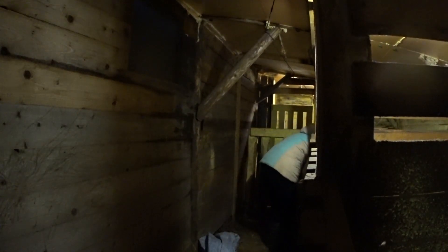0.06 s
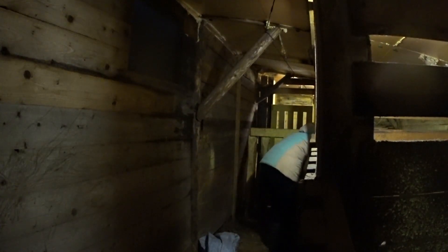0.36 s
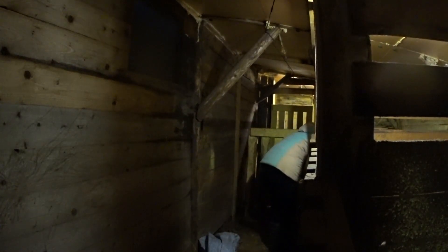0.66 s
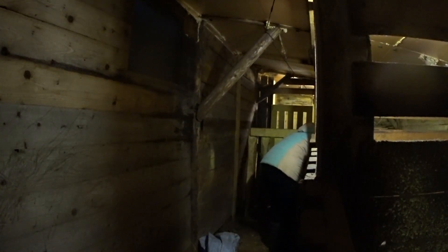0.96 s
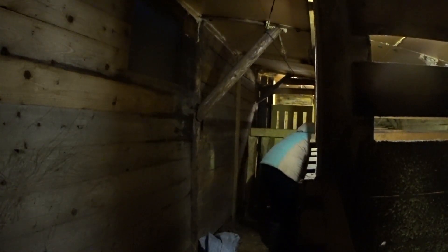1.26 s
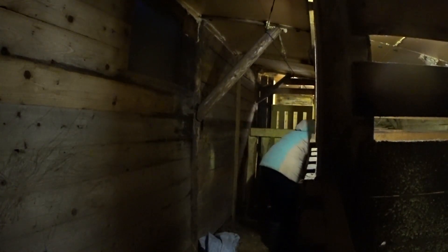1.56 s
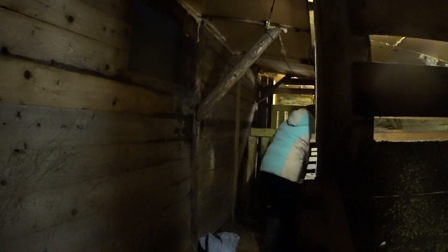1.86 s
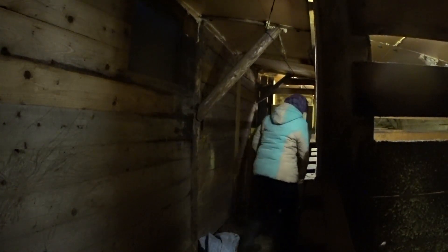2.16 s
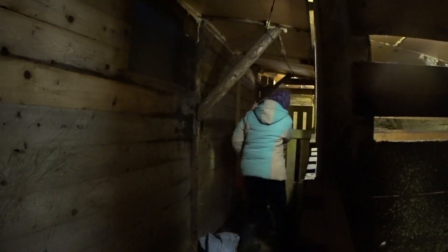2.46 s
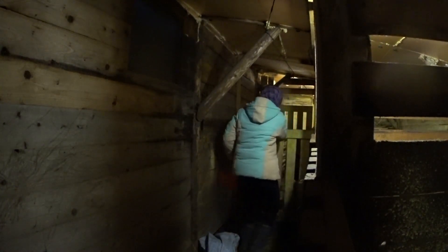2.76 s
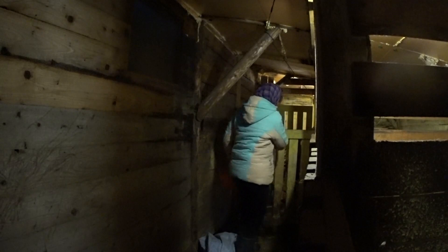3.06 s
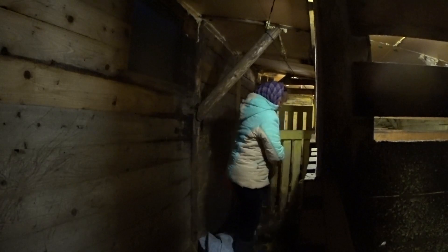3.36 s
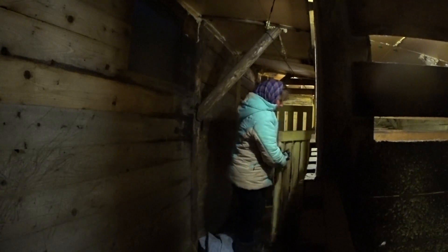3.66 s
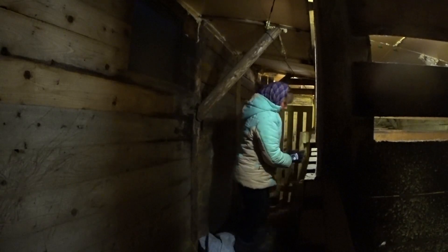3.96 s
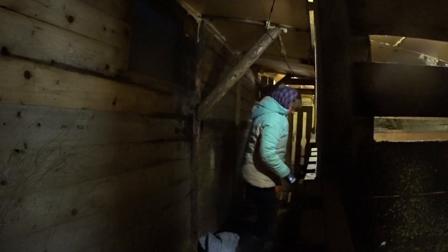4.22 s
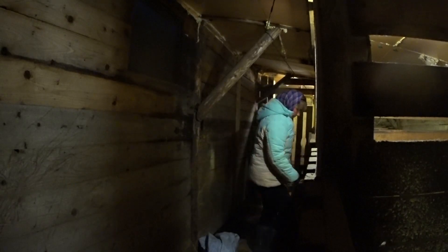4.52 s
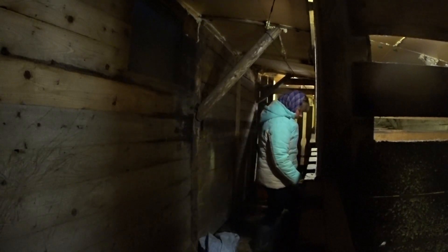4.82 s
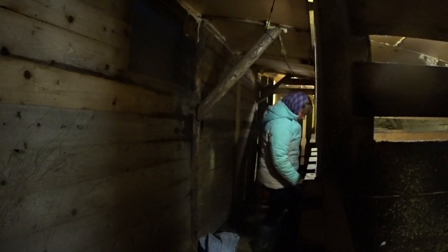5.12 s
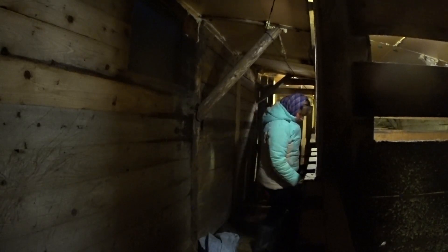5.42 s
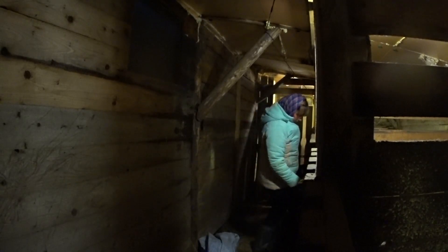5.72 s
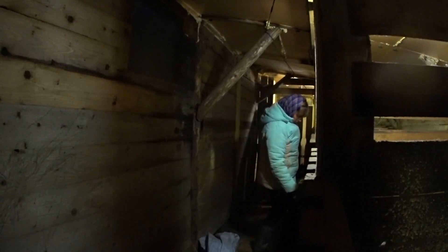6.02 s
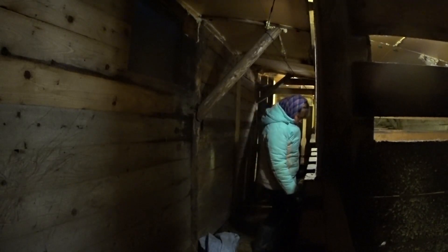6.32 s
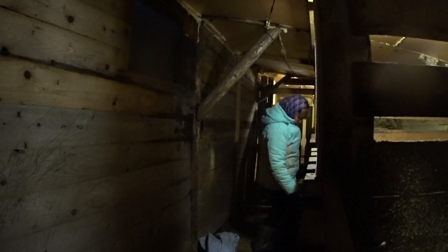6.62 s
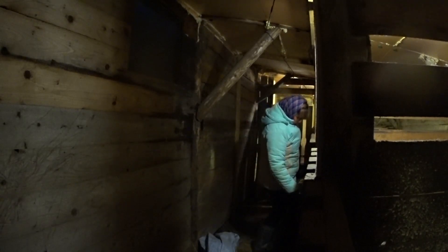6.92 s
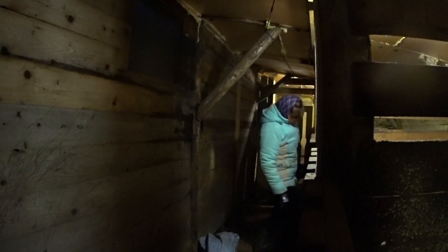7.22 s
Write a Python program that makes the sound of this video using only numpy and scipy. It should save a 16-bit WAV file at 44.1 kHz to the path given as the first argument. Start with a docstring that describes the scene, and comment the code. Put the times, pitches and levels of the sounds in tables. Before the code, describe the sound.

Feed pellets pour into a ringing trough, a jacket swishes, a wooden gate thumps shut, and a scoop clatters against boards.

```python
"""In a wooden barn, feed pellets pour from a scoop, pattering and hissing into a ringing trough.
A person steps back, their padded jacket swishing and their boots scuffing the littered floor.
They move a slatted pen gate, which thumps shut, and a thin metal scrape follows.
Last, the scoop clatters against the pen boards. Close plank walls thicken every blow with echoes,
and it is all heard through two microphones set close together."""
import sys
import numpy as np
from scipy import signal
from scipy.fft import rfft, irfft, next_fast_len
from scipy.io import wavfile
from scipy.ndimage import map_coordinates

SR = 44100
rng = np.random.default_rng(int(sys.argv[2]) if len(sys.argv) > 2 else 0)


def inscribe(sig):
    """Save sig as 16-bit PCM at rate SR to the path in sys.argv[1].

    A 1-D sig is mono; a 2-D sig holds one channel per row.
    Samples are clipped to [-1, 1] before scaling.
    """
    pcm = np.round(np.clip(np.atleast_2d(sig).T, -1, 1) * 32767)
    wavfile.write(sys.argv[1], SR, pcm.astype(np.int16))


N = 325458

# Levels are relative. A "tone" table says how strong low and high sounds are.
# A "ring time" is how long a sound takes to fade by 60 dB.
# the barn's still air: (frequency [Hz], level [dB])
AIR_TONE = [(60, -15.0), (800, 0), (3000, -13.0), (11000, -12.5)]
# how long the barn echoes: (frequency [Hz], ring time [s])
BARN_RING_TIMES = [(60, 0.52), (260, 0.26), (700, 0.23), (1840, 0.2), (4850, 0.18), (11000, 0.084)]
# echoes from the nearest planks: (delay [s], level [dB])
WALL_ECHOES = [(.0029, -36), (.0068, -24.5), (0.0113, -15.5), (0.0169, -18)]

# sleeve rubbing on jacket: (peak time [s], level [dB], rise [s], fall [s], level change for zing [dB])
SLEEVE_STROKES = [(1.544, -55.5, 0.083, 0.062, -9), (1.70, -57, 0.1, 0.028, -7),
                  (1.845, -48.5, 0.11, 0.044, -7.5), (1.994, -50.5, 0.092, 0.049, -6),
                  (2.166, -45.5, 0.068, 0.037, -4), (2.336, -44, .11, 0.042, -7),
                  (2.526, -53, 0.13, .06, -4.5), (2.681, -40, .08, 0.02, 2.5),
                  (2.744, -42.5, 0.1, 0.06, -9), (2.845, -48.5, .09, 0.017, -4.5),
                  (2.97, -57.5, .09, 0.11, -5), (3.211, -55.5, 0.039, .08, 2),
                  (3.339, -46.5, 0.17, 0.076, -3), (3.56, -59.5, 0.16, 0.066, -12),
                  (3.714, -63, 0.069, 0.028, -1.5), (3.848, -57.5, 0.078, 0.06, -7.5),
                  (4.07, -62.5, 0.17, 0.057, -5), (4.186, -44, 0.13, 0.042, -6.5),
                  (4.30, -51.5, .04, 0.097, -8), (4.53, -57, 0.14, .03, -5),
                  (4.587, -36.5, 0.073, 0.025, -3.5), (4.795, -47, 0.025, 0.095, 0.5),
                  (4.856, -32.5, .013, 0.042, -24), (4.971, -39.5, 0.041, 0.021, 1.5),
                  (5.104, -51.5, 0.18, 0.18, -4.5), (5.254, -61, .08, 0.022, 6),
                  (5.375, -60.5, .1, 0.038, -1), (5.615, -70, .05, 0.022, -9),
                  (5.866, -51.5, .032, 0.17, -11), (6.075, -56, 0.075, 0.056, -7),
                  (6.222, -47.5, 0.014, 0.23, -3.5), (6.558, -42.5, 0.083, 0.019, -3),
                  (6.70, -44.5, 0.073, 0.032, 0), (7.0, -42, 0.39, 0.14, -8.5),
                  (7.13, -43.5, 0.11, 0.048, -4), (7.24, -41.5, 0.043, 0.095, -3.5)]
# the nylon's swish: (frequency [Hz], level [dB])
SWISH_TONE = [(150, -30.5), (400, -10.5), (800, 4), (1500, 3.5), (2800, 1), (4500, -1), (6500, -4.5),
              (8500, -15.5), (11000, -21.5)]
# the nylon's high zing: (frequency [Hz], level [dB])
ZING_TONE = [(4000, -41.5), (6500, -1), (8000, 1.5), (11000, -8)]
# boots and gate dragging over litter:
# (peak time [s], level [dB], rise [s], fall [s], centre frequency [Hz], hollow boost [dB])
DRAGS = [(1.389, -46.5, 0.037, 0.04, 463, 9), (1.614, -49, 0.023, 0.02, 430, -2),
         (1.815, -40.5, 0.027, 0.061, 890, -2.5), (1.99, -50.5, 0.049, 0.092, 880, 5),
         (2.275, -35.5, 0.0117, 0.07, 436, -19), (2.429, -52, 0.21, 0.27, 726, -20.5),
         (2.533, -33.5, 0.018, 0.029, 830, -7), (2.799, -41, 0.074, 0.038, 463, 10),
         (3.0, -55, 0.064, 0.12, 1130, -1), (3.31, -50, 0.04, 0.067, 885, 0),
         (3.5, -46, 0.071, 0.064, 804, 4.5), (3.854, -44, 0.021, 0.03, 1060, -2),
         (4.162, -38, 0.037, 0.078, 1190, 4), (4.332, -35.5, 0.024, 0.036, 935, 7),
         (4.5, -53.5, 0.07, 0.046, 810, 3), (4.59, -44, 0.011, 0.052, 1420, -1),
         (4.804, -36.5, 0.0099, 0.018, 705, 0), (5.17, -58, 0.054, 0.045, 900, -4),
         (5.369, -36.5, 0.028, 0.026, 1080, 8.5), (5.48, -65, 0.049, 0.057, 864, 5.5),
         (5.625, -61, 0.027, 0.025, 1003, -1.5), (5.89, -45, 0.019, 0.082, 955, 8.5),
         (6.07, -39.5, 0.012, 0.036, 870, 1), (6.11, -39, 0.023, 0.032, 696, 1.5),
         (6.67, -41, 0.043, 0.13, 646, -5), (7.161, -36, 0.06, 0.032, 590, 10.5),
         (7.243, -31, 0.015, 0.048, 786, 3), (7.36, -36, 0.042, 0.042, 905, -15)]
# crushed litter: (frequency [times the centre frequency], level [dB])
LITTER_TONE = [(.05, -34), (.15, -25), (.4, -5.5), (.72, 0), (1, 3.5), (1.55, 1.5), (2.5, -6), (5, -20.5),
               (12, -42.5)]
# a thin scrape, perhaps the gate's fastening: (time [s], level [dB])
SCRAPE_LEVELS = [(4.98, -55), (5.04, -53), (5.09, -45), (5.17, -48.5), (5.25, -53), (5.3, -74)]
# the notes of the scraped metal: (frequency [Hz], width [Hz], level [dB])
SCRAPE_NOTES = [(4420, 400, -4), (4950, 300, -7), (5430, 230, -1.5)]
# bright pings, and a low hum around the scoop's knocks:
# (time [s], frequency [Hz], level [dB], rise [s], ring time [s], width [Hz])
RINGING_NOTES = [(0.796, 2690, -27, .008, 0.096, 190), (1.80, 762, -40.5, 0.012, 0.22, 83),
                 (4.829, 1224, -17.5, 0.0027, 0.077, 56), (5.881, 976, -37.5, 0.0015, 0.09, 23),
                 (5.882, 1840, -42, .002, 0.11, 114), (6.064, 362, -50, 0.06, 0.25, 12),
                 (6.258, 369, -37.5, 0.0043, 0.62, 31), (6.266, 9100, -43.5, 0.0089, 0.18, 95),
                 (6.331, 3000, -20.5, .003, 0.056, 81), (6.74, 2603, -21.5, 0.0027, 0.14, 43),
                 (6.832, 1941, -16.5, 0.0085, 0.28, 16.8), (6.832, 1995, -25.5, .006, 0.5, 105),
                 (6.839, 359.6, -34, 0.032, 0.43, 40), (7.268, 1256, -18, 0.0011, 0.15, 35),
                 (7.269, 3080, -20.5, 0.0027, 0.067, 190)]

# heavy blows on wood:
# (time [s], level [dB], bass tilt [dB per octave], rise [s], board note [Hz], width [Hz], echo [dB])
HEAVY_BLOWS = [(2.254, -47, 7, 0.002, 397, 298, -18), (2.3, -27, 10, 0.0027, 440, 260, -21.5),
               (2.315, -26, 10.5, 0.0043, 326, 200, -15.5), (2.338, -32, 3, 0.0099, 480, 300, -14),
               (2.738, -24, -4.5, 0.014, 1100, 500, -17.5), (2.836, -34.5, -4, 0.0072, 540, 400, -16.5),
               (4.188, -31.5, -0.5, 0.00075, 740, 400, -7), (4.828, -10, -.5, 0.0038, 660, 250, -12),
               (4.854, -11, 2, 0.0035, 488, 250, -12), (4.885, -26.5, 9, .004, 150, 99, -13.5),
               (4.904, -28.5, -9, 0.0043, 1430, 500, -10.5), (5.357, -39, -4, .006, 1280, 600, -12),
               (5.881, -42, -12, 0.00093, 1340, 620, -16), (6.701, -22.5, -2.5, 0.0014, 650, 306, -7),
               (6.984, -19, -1.5, 0.0038, 810, 200, -7)]
# a dull blow on wood: (frequency [Hz], level [dB])
THUMP_TONE = [(30, -50.5), (55, -51), (85, -26.5), (150, -23), (245, -11), (450, -5.5), (750, -1.5),
              (950, -1.5), (1300, -5), (1850, -7.5), (2400, -21.5), (3300, -36.5), (6400, -42.5),
              (11000, -60.5)]
# the scoop hitting the boards:
# (time [s], level [dB], treble tilt [dB per octave], low note [Hz], high note [Hz], echo [dB])
SCOOP_HITS = [(6.255, -11.5, 2, 1590, 1930, 1), (6.281, -19, -1, 1310, 1700, 18),
              (6.328, -9.5, 0.5, 1644, 3140, 0.5), (6.453, -20, 0.5, 1530, 4660, 12),
              (6.467, -9.5, 0.4, 550, 1480, -5), (6.514, -16, -4, 1023, 1470, -6),
              (6.740, -11, 0, 1704, 2520, -8), (6.777, -17, -0.5, 1600, 2550, -6),
              (6.826, -12, 0.6, 1540, 1940, -3.5), (6.850, -23, 0.5, 1370, 2000, 15),
              (6.880, -21.5, -1.5, 945, 2700, 17), (6.915, -18.5, -2.5, 1260, 1950, 16),
              (7.0482, -15, -1.5, 1190, 1600, -5), (7.061, -16, -2.5, 1320, 1750, 0),
              (7.267, -12.5, -1.6, 1195, 2510, -3)]
# a hard knock on the boards: (frequency [Hz], level [dB])
CLACK_TONE = [(30, -66), (55, -44), (80, -38), (200, -30), (350, -21.5), (560, -5.5), (960, -2.5),
              (1480, 0), (1980, -2), (2320, -8), (3100, -10.5), (3800, -18), (4770, -17.5), (11000, -35)]
# the notes the scoop rings with: (frequency [Hz], level [dB], ring time [s])
SCOOP_NOTES = [(378, -17.5, 0.29), (648, -7, 0.094), (1036, -14, 0.11), (1427, 11, 0.061),
               (1520, -11.5, 0.15), (1588, -20, 0.076), (1719, 5, 0.16), (2710, -16, 0.29),
               (2720, -6, 0.13), (2820, -0.5, 0.086), (4560, -6, 0.11), (5870, -13, 0.13),
               (7400, -22, 0.26)]

# the stream of feed as the scoop tips and empties: (time [s], level [dB])
FEED_FLOW = [(0.0, -25), (0.024, -23.5), (0.07, -27.5), (0.17, -22), (0.216, -25.5), (0.45, -19),
             (0.554, -25.5), (0.572, -25), (0.626, -27), (0.68, -24.5), (0.746, -29), (0.814, -24.5),
             (0.834, -30.5), (0.926, -25.5), (1.22, -24.5), (1.386, -40), (1.448, -56.5), (1.5, -59)]
# lumps of feed sliding out at once: (peak time [s], thud level [dB], spray level [dB])
FEED_LUMPS = [(.015, -34, -50), (.12, -35.5, -45), (.195, -28.5, -27), (.46, -29, -29), (.505, -35.5, -32),
              (.575, -43, -25.5), (.675, -52.5, -32.5), (.815, -33.5, -30.5), (.98, -37, -49),
              (1.095, -55, -30.5), (1.205, -35.5, -37), (1.37, -47, -49)]
# the trough's floor drumming: (frequency [Hz], level [dB])
DRUM_TONE = [(35, -53.5), (70, -44), (115, -41.5), (165, -17.5), (220, -11.5), (340, -3.5), (440, 5.5),
             (560, 5), (800, -16), (2000, -40.5)]
# pellets landing: (frequency [Hz], level [dB])
PATTER_TONE = [(100, -53), (300, -21.5), (600, -10), (950, -1), (1420, -2.5), (2140, -1), (3400, -9.5),
               (6200, -16.5), (11000, -30)]
# pellets sliding over each other: (frequency [Hz], level [dB])
HISS_TONE = [(1500, -46.5), (3000, 4.5), (4500, 0.5), (7000, -3.5), (9500, -8), (11000, -15.5)]
# the notes the trough rings with: (frequency [Hz], width [Hz], level [dB])
TROUGH_NOTES = [(395, 4.5, -11.5), (434, 17, -9), (724.5, 19, 0.5), (905, 27, -9), (1189, 22, 3),
                (1387, 71, 7.5), (1640, 45, -6), (1865, 17, 1.5), (2414, 38, -2), (3280, 67, -14.5)]

# how far the wave at the left microphone runs ahead: (frequency [Hz], phase [radians])
LEFT_LEAD = [(30, .05), (130, 1), (340, 0.73), (600, 0.99), (1000, 1), (1700, 0.84), (2300, 0.69),
             (4100, .16), (10500, .08)]
# sound arriving from all around: (frequency [Hz], level of side against mid [dB])
STEREO_WIDTH = [(30, -13.5), (130, -19), (500, -22.5), (1200, -17.5), (2500, -11), (9000, -10)]


def amp(db):
    """Turn decibels into a number to multiply by."""
    return 10 ** (np.asarray(db) / 20)


def unit(x):
    """Scale a sound to an average strength (rms) of 1."""
    return x / np.sqrt(np.mean(x ** 2) + 1e-20)


def unit_start(x):
    """Scale a blow so that its first 20 ms have an average strength of 1."""
    return x / np.sqrt(np.mean(x[0, :SR // 50] ** 2))


def along(points, hz):
    """Read between the rows of a (frequency, value) table, spacing octaves evenly."""
    freqs, values = np.transpose(points)
    return np.interp(np.log(hz + 1e-3), np.log(freqs), values)


def peak(f, hz, width_hz):
    """A bell-shaped bump of height 1 around one frequency."""
    return 1 / (1 + (2 * (f - hz) / width_hz) ** 2)


def octaves(hz):
    """Octaves above 1000 Hz, levelling off at both ends."""
    return np.log2(np.clip(hz, 250, 6000) / 1000)


def add(track, start_s, x):
    """Mix a sound into the track at the given time."""
    start = max(round(start_s * SR), 0)
    part = track[:, start:start + x.shape[-1]]
    part += x[..., :part.shape[-1]]


def level_curve(rows):
    """Join (time, level) points into a volume curve, silent outside them."""
    times, levels = np.transpose(rows)
    return amp(np.interp(np.arange(N) / SR, times, levels, left=-120, right=-120))


def swells(rows):
    """A volume curve for movements that each start from rest, peak and die away."""
    t = np.arange(N) / SR
    power = np.zeros(N)
    for s, db, rise, fall in rows:
        near = slice(max(int((s - rise) * SR), 0), int((s + 1) * SR))
        age = t[near] - s
        attack = np.clip(1 + age / rise, 0, 1) ** 1.7  # a gentle start
        fade = np.exp(-np.maximum(age, 0) / fall)
        power[near] += (amp(db) * attack * fade) ** 2
    return np.sqrt(power)


def wobble(rate, size):
    """A smooth curve through `rate` random points a second."""
    points = rng.standard_normal(int(size * rate / SR) + 4)
    return map_coordinates(points, [np.arange(size) * rate / SR])


def colour(x, db_of_hz):
    """Turn each frequency up or down by the given curve."""
    n = x.shape[-1]
    m = 2 * next_fast_len(n // 2 + 2048)
    gain = np.maximum(amp(db_of_hz(np.fft.rfftfreq(m, 1 / SR))), 1e-6)
    cepstrum = irfft(np.log(gain), m)
    # folding this in half makes the filter ring only after a hit, never before
    cepstrum[1:m // 2] *= 2
    cepstrum[m // 2 + 1:] = 0
    return irfft(rfft(x, m) * np.exp(rfft(cepstrum)), m)[..., :n]


def grains(rate, spread_db, size):
    """About `rate` tiny hits a second, in two rows: mid (shared by both ears) and side (left vs right)."""
    hit = rng.random(size) < rate / SR
    strength = amp(spread_db * np.clip(rng.standard_normal(size), -2, 2))
    return unit(hit * strength * rng.standard_normal((2, size)))


def rustle(tone, rate, spread_db):
    """Many tiny hits blur into a steady noise with the given tone."""
    return unit(colour(grains(rate, spread_db, N), lambda f: along(tone, f)))


def resonate(notes, rate, wander_db):
    """Tiny hits keep an object's notes ringing; each swells and fades as the contact moves."""
    out = np.zeros((2, N))
    for hz, width, db in notes:
        volume = amp(db + wander_db * wobble(11.28, N))
        band = signal.iirpeak(hz, hz / width, SR)
        out += volume * unit(signal.lfilter(*band, grains(rate, spread_db=4, size=N)))
    return unit(out)


def wavering_note(hz, width_hz, size):
    """A note that drifts in strength and pitch; more width means faster drift."""
    drift = 1 + 0.93 * wobble(2 * width_hz, size) + 0.7j * wobble(2 * width_hz, size)
    cycles = rng.random() + hz * np.arange(size) / SR
    return unit(np.real(drift * np.exp(2j * np.pi * cycles)))


def blow(ring_s, echo_db, rise_s):
    """A burst of noise from struck boards, then the barn's longer echo."""
    t = np.arange(SR // 2) / SR
    hz, times, spectrum = signal.stft(rng.standard_normal((2, len(t))), SR, nperseg=256)
    fade = amp(-60 * times / along(BARN_RING_TIMES, hz)[:, None])
    tail = signal.istft(spectrum * fade, SR, nperseg=256)[1][:, :len(t)]
    echo = amp(echo_db) * tail * (1 - np.exp(-t / 0.0097))
    burst = rng.standard_normal((2, len(t))) * amp(-60 * t / ring_s)
    return (burst + echo) * (1 - np.exp(-t / rise_s))


def barn_air():
    """The still air of the barn is a very faint, steady hush."""
    return amp(-88) * unit(colour(rng.standard_normal((2, N)), lambda f: along(AIR_TONE, f)))


def wall_echoes(x):
    """Close plank walls send back quick, quieter copies that thicken the sound."""
    out = x.copy()
    for delay, db in WALL_ECHOES:
        add(out, delay, amp(db) * x)
    return out / np.sqrt(1 + sum(amp(db) ** 2 for _, db in WALL_ECHOES))


def jacket():
    """Nylon swishes as the arms move; each stroke has its own amount of high zing."""
    swish_level = swells([(s, db, rise, fall) for s, db, rise, fall, _ in SLEEVE_STROKES])
    zing_level = swells([(s, db + zing_db, rise, fall) for s, db, rise, fall, zing_db in SLEEVE_STROKES])
    swish = rustle(SWISH_TONE, rate=12000, spread_db=1.8)
    zing = rustle(ZING_TONE, rate=12000, spread_db=1.4)
    return amp(wobble(60, N)) * (amp(4) * swish_level * swish + zing_level * zing)


def floor_scuffs():
    """Each drag crushes litter into a gritty swell, coloured by the hollow boards beneath."""
    out, t = np.zeros((2, N)), np.arange(-SR // 4, SR // 3) / SR
    for s, db, rise, fall, hz, hollow_db in DRAGS:
        swell = np.exp(np.where(t < 0, t / rise, -t / fall))
        floor = lambda f: along(LITTER_TONE, f / hz) + hollow_db * peak(f, hz, 0.26 * hz)
        grit = unit(colour(grains(rate=3000, spread_db=1.0, size=len(t)), floor))
        add(out, s + t[0], amp(db + 0.71 * wobble(80, len(t))) * swell * grit)
    return out


def metal_scrape():
    """Metal slides on metal and rings faintly."""
    return level_curve(SCRAPE_LEVELS) * resonate(SCRAPE_NOTES, rate=2100, wander_db=-1.5)


def ringing_notes():
    """Bright pings, and a low hum around the scoop's knocks, each fade at one slightly unsteady pitch."""
    out, t = np.zeros((2, N)), np.arange(SR // 2) / SR
    for s, hz, db, rise, ring_s, width_hz in RINGING_NOTES:
        swell = amp(-60 * t / ring_s) * (1 - np.exp(-t / rise))
        add(out, s, amp(db + 3) * swell / swell.max() * wavering_note(hz, width_hz, len(t)))
    return out


def wood_thumps():
    """Boots land on the planks and the gate hits its post, each with a dull wooden note."""
    out = np.zeros((2, N))
    for s, db, bass_db, rise, hz, width_hz, echo_db in HEAVY_BLOWS:
        board = lambda f: along(THUMP_TONE, f) - bass_db * octaves(f) + 8 * peak(f, hz, width_hz)
        thump = colour(blow(ring_s=0.054, echo_db=echo_db, rise_s=rise), board)
        add(out, s, amp(db - 1.5) * unit_start(thump))
    return out


def scoop_knocks():
    """Each knock clacks on the boards and rings the scoop; the spot that is hit brings out two notes."""
    out, t = np.zeros((2, N)), np.arange(SR // 2) / SR
    for s, db, treble_db, low_hz, high_hz, echo_db in SCOOP_HITS:
        clack = colour(blow(ring_s=0.086, echo_db=echo_db, rise_s=0.0033), lambda f: along(CLACK_TONE, f))
        ring = np.zeros((2, len(t)))
        for hz, note_db, ring_s in SCOOP_NOTES:
            fade = amp(note_db + rng.normal(0, 2.5) - 60 * t / ring_s)
            cycles = hz * rng.normal(1, 0.0035) * t + rng.random((2, 1))
            ring += fade * np.sin(2 * np.pi * cycles)
        ring *= 1 - np.exp(-t / 0.0014)
        knock = unit_start(clack) + amp(-8) * unit_start(ring)
        spot = lambda f: treble_db * octaves(f) + 7 * peak(f, low_hz, 67) + 7 * peak(f, high_hz, 210)
        add(out, s, amp(db - 1) * unit_start(colour(knock, spot)))
    return out


def pouring_feed():
    """Pellets drum, patter and hiss into the ringing trough; each lump adds a thud and a spray."""
    rise_s, fall_s = 0.028, 0.024
    stream = level_curve(FEED_FLOW)
    thud = swells([(s, db, rise_s, fall_s) for s, db, _ in FEED_LUMPS])
    spray = swells([(s, db, rise_s, fall_s) for s, _, db in FEED_LUMPS])
    clumps = amp(0.9 * wobble(90, N))
    drum = np.hypot(amp(-21) * stream, thud) * rustle(DRUM_TONE, rate=3000, spread_db=1.5)
    patter = amp(-1.5) * stream * rustle(PATTER_TONE, rate=4000, spread_db=1.1)
    hiss = np.hypot(amp(-8.5) * stream, spray) * rustle(HISS_TONE, rate=6000, spread_db=1.3)
    ring = amp(-5) * stream * resonate(TROUGH_NOTES, rate=600, wander_db=3.5)
    return clumps * (drum + patter + hiss + ring)


def scene():
    """All the sounds over the barn's still air, as they reach the left and right microphones."""
    air = barn_air()
    action = pouring_feed() + jacket() + floor_scuffs() + metal_scrape() + wood_thumps() + scoop_knocks()
    mid, side = wall_echoes(action) + ringing_notes() + air
    m = next_fast_len(N + SR // 4)
    hz = np.fft.rfftfreq(m, 1 / SR)
    sign = np.array([[1], [-1]])  # left, right
    stereo = rfft(mid, m) + sign * rfft(side, m) * amp(along(STEREO_WIDTH, hz))
    stereo *= np.exp(0.5j * sign * along(LEFT_LEAD, hz))
    return irfft(stereo, m)[:, :N] * amp(0.33 * sign + 0.5)  # the left is a little louder


def record(dry):
    """Round off the loudest peaks and cut away the highest treble."""
    top_hz = 11200
    rounded = dry / (1 + np.abs(dry) ** 6) ** (1 / 6)
    m = next_fast_len(N + SR // 4)
    hz = np.fft.rfftfreq(m, 1 / SR)
    return irfft(rfft(rounded, m) / np.sqrt(1 + (hz / top_hz) ** 400), m)[:, :N]


dry = scene()
out = record(dry)
inscribe(out)
```